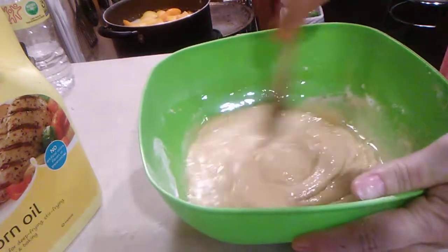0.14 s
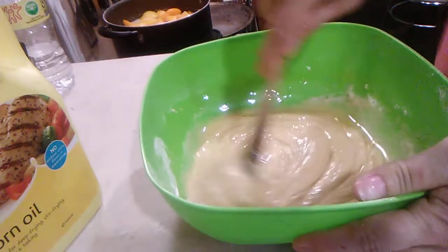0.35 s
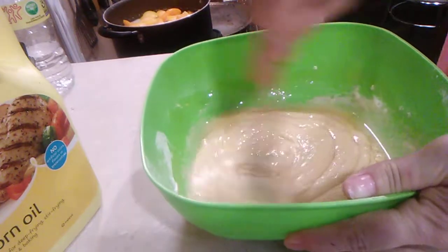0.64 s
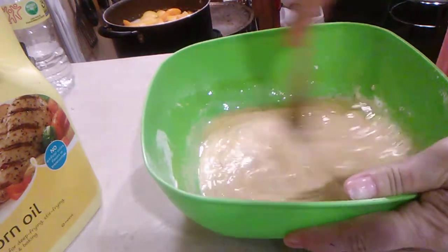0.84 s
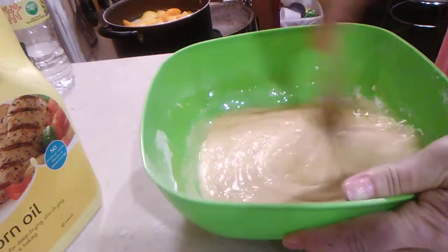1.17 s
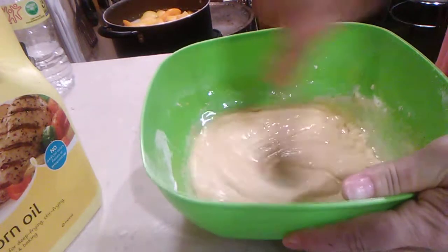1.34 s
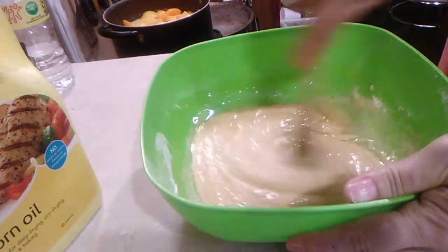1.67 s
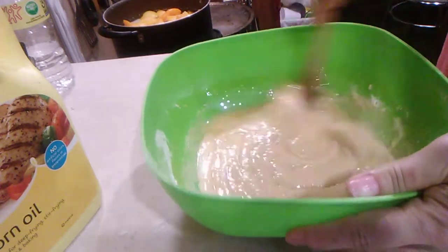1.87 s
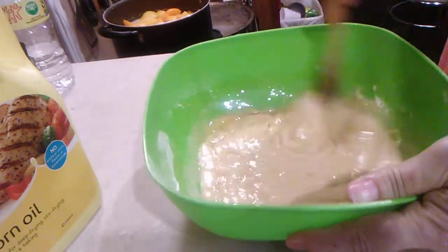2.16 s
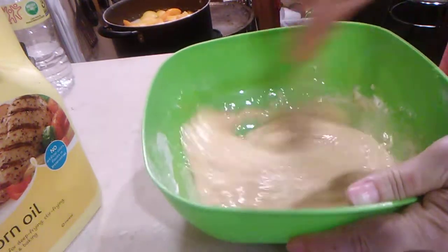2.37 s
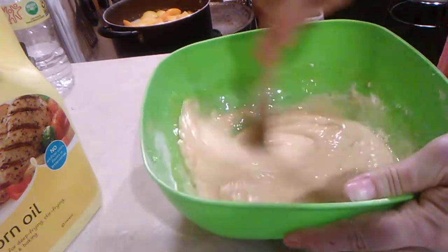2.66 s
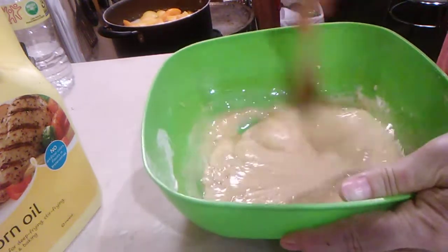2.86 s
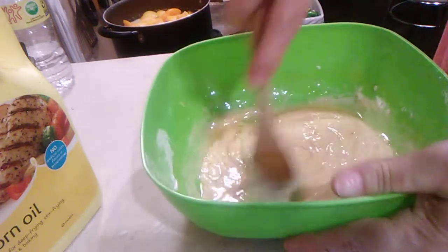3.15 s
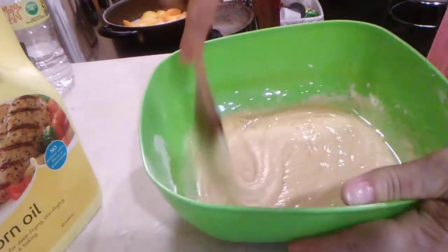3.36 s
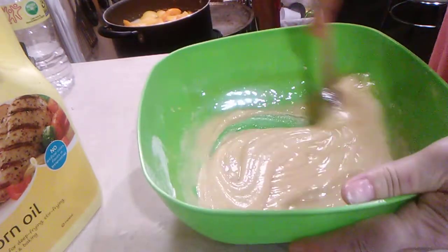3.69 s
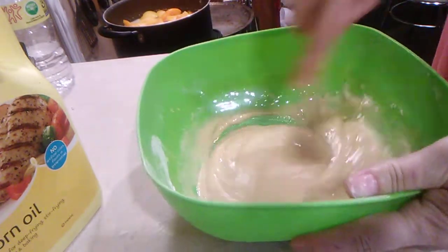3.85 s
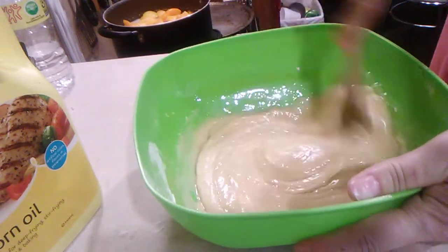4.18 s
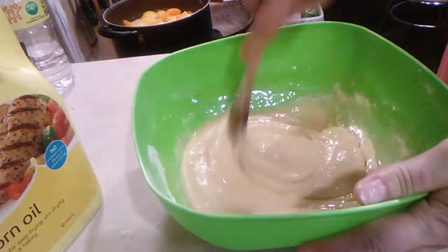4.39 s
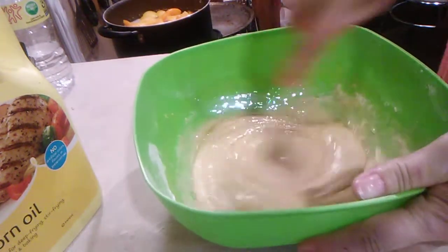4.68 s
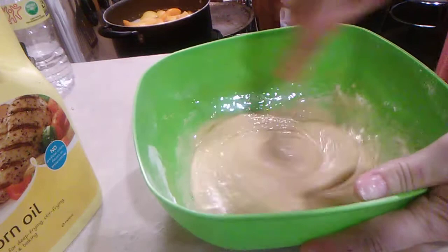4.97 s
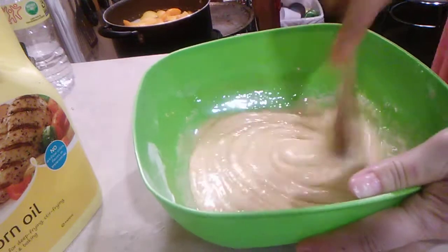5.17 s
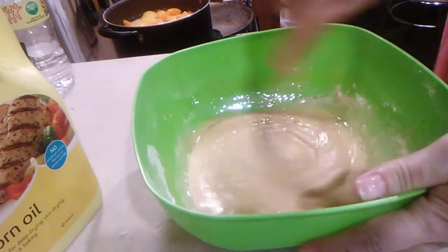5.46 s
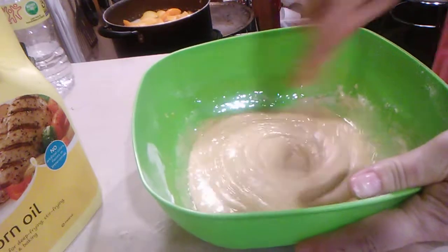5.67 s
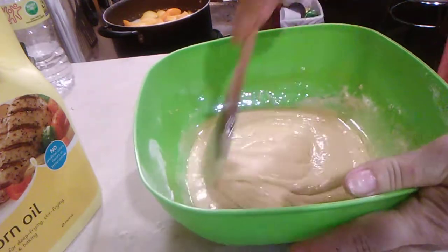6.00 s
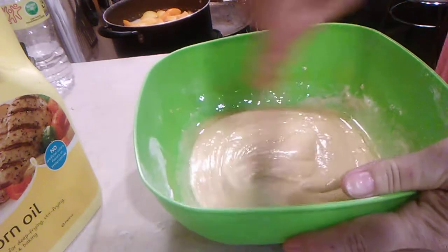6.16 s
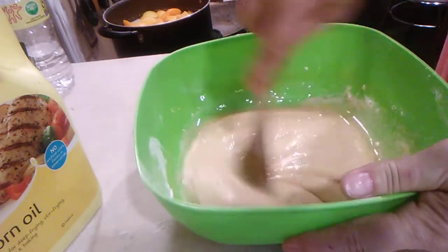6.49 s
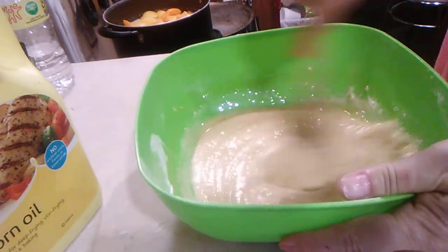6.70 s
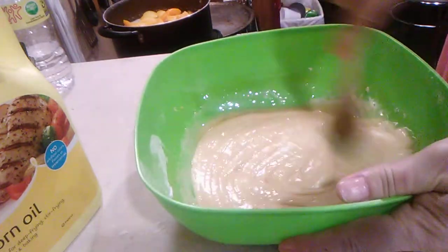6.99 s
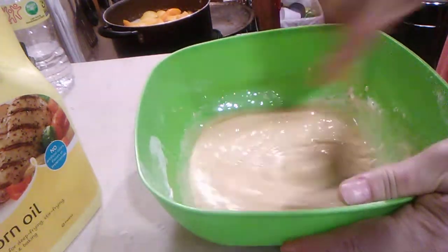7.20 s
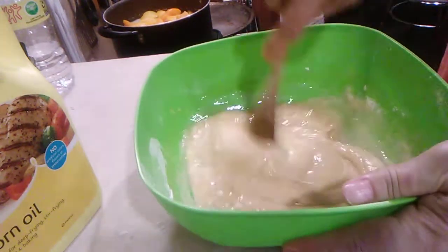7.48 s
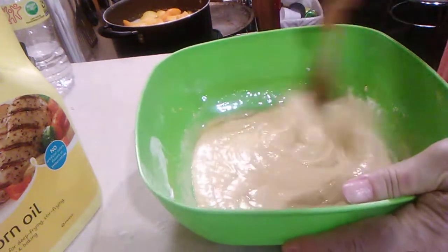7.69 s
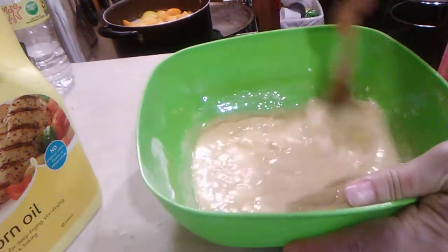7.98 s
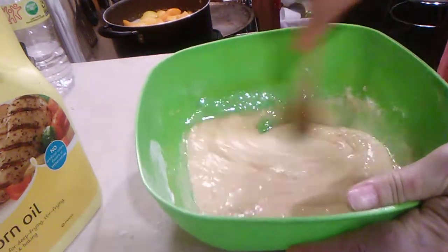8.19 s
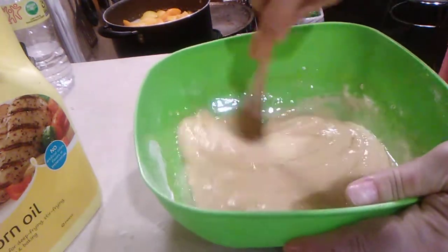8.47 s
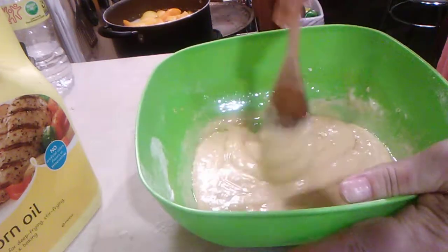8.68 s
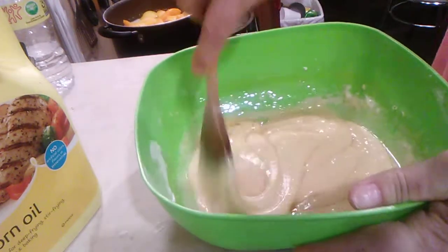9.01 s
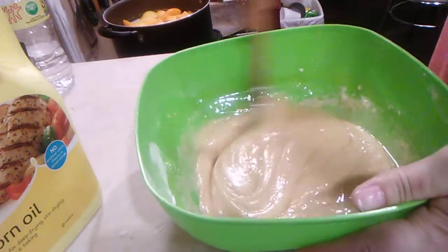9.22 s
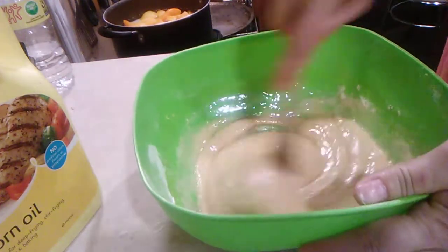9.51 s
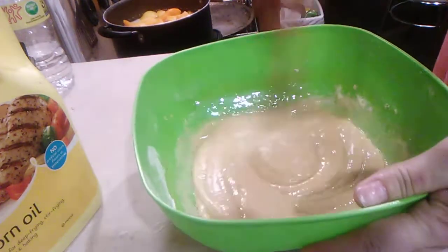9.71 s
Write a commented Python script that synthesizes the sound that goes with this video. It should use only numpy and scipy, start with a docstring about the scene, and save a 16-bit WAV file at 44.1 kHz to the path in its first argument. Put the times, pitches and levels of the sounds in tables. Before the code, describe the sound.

A wooden spoon beats thick batter in a plastic bowl, with hollow knocks, sticky wet crackle, smacks and soft table bumps in a small kitchen.

```python
"""A wooden spoon beats thick batter in a hand-held plastic bowl: knocks ring the bowl's damped wall.
Pressed along the wall, the spoon sticks and slips in soft gulps, and once its edge rasps.
The batter crackles with bursts of tiny rising pings, smacks as films rip, and plops as air pockets ring.
The bowl bumps the kitchen table with low bouncing tones and rumbles as filtered noise.
A small room adds an echo and a fading tail; faint air noise, a wavering hum and a thin whine lie behind."""
import sys
import numpy as np
from scipy import signal
from scipy.fft import rfft, irfft, next_fast_len
from scipy.io import wavfile
from scipy.ndimage import uniform_filter1d

SR = 44100
rng = np.random.default_rng(int(sys.argv[2]) if len(sys.argv) > 2 else 0)


def to_wav(sig):
    """Store sig (one row per channel, or 1-D mono) as 16-bit WAV at the path in sys.argv[1].

    Samples outside -1..1 are clipped; the rate is SR.
    """
    pcm = np.clip(np.atleast_2d(sig), -1, 1) * 32767
    pcm = np.round(pcm).astype(np.int16)
    wavfile.write(sys.argv[1], SR, pcm.T)  # frames by channels


N = 434365
TIME = np.arange(N) / SR
# a sweep through the batter sets in, swells towards its middle and dies away
SWEEP_ATTACK_S, SWEEP_SWELL_DB, SWEEP_RELEASE_S = .006, 3, 0.033
# table levels are starting levels: each function may add its own gain, and the room comes after


def amp(db):
    """Turns decibels into a gain."""
    return 10 ** (np.asarray(db) / 20)


def evened(x):
    """Scales a sound to an average strength (rms) of 1."""
    return x / np.sqrt(np.mean(x ** 2) + 1e-20)


def steadied(x, size=2200):
    """Evens out the slow ups and downs of a texture while keeping its fine grain."""
    power = uniform_filter1d(uniform_filter1d(np.mean(evened(x) ** 2, 0), size), size // 2)
    return evened(x) / np.sqrt(abs(power) + 1e-3)


def read(points, hz):
    """Reads a table between its points on a log-frequency axis."""
    f, value = np.transpose(points)
    return np.interp(np.log(hz + 1), np.log(f + 1), value)


def follow(rows, axis):
    """Draws one column of a table as a curve over every sample."""
    rows = np.array(rows)
    return np.interp(TIME, rows[:, 0], rows[:, axis])


def add(mix, s, sound):
    """Adds a sound into the mix at a time in seconds."""
    part = mix[..., max(round(s * SR), 0):][..., :sound.shape[-1]]
    part += sound[..., :part.shape[-1]]


def ring(x, response):
    """Makes a sound ring through an impulse response."""
    return signal.fftconvolve(np.atleast_2d(x), np.atleast_2d(response), axes=1)[:, :x.shape[-1]]


def colour(points, size=2048):
    """Makes a unit-energy filter that starts at once and has the given spectrum (minimum phase)."""
    log_gain = np.log(amp(read(points, abs(np.fft.fftfreq(size, 1 / SR)))))
    h = np.fft.ifft(np.exp(np.conj(signal.hilbert(log_gain)))).real[:size // 2]
    return h / np.linalg.norm(h)


def wander(hz):
    """Drifts at random with rms 1, up to the given rate."""
    step_s = 1 / (hz * 2)
    return evened(np.interp(TIME / step_s, np.arange(2048), rng.standard_normal(2048)))


def grains(per_s, spread_db, scatter):
    """Scatters clicks of uneven size, each with its own strength on the left and right."""
    size = amp(spread_db * np.minimum(rng.exponential(1, N), 4.5))
    clicks = size * (rng.random(N) < per_s / SR) * rng.choice([-1, 1], N)
    return evened(clicks * (1 + scatter * rng.standard_normal((2, N))))


def strokes(rows, axis, attack_s, swell_db, release_s):
    """Follows the level of strokes: each sets in, arches over its length and dies away."""
    power, t = np.zeros(N), TIME[:SR]
    for row in rows:
        start, length = row[:2]
        arch = np.sin(np.pi * np.minimum(t / length, 1)) - 1
        shape = (1 - np.exp(-t / attack_s)) * np.exp(-np.maximum(t - length, 0) / release_s)
        add(power, start, (amp(row[axis] + swell_db * arch) * shape) ** 2)
    return np.sqrt(power)


def settling(hits, settle_s):
    """Follows a level that jumps with each hit and settles."""
    level = np.zeros(N)
    for s, db, *_ in hits:
        add(level, s, amp(db) * np.exp(-TIME[:SR] / settle_s))
    return level


# ringing tones of the batter-loaded bowl: (pitch [Hz], level [dB], time to fade by 60 dB [s])
BOWL_MODES = [(284, -4.5, 0.046), (386, -8.5, 0.019), (480, 1.5, 0.021), (536.9, 9.5, 0.03),
              (610, 14, 0.027), (673.3, 3.5, 0.029), (771, -5.5, 0.0087), (896, -14, 0.018),
              (1058, -22, 0.054), (1295, -16, 0.025), (1405, -17, 0.035), (1680, -20, 0.011),
              (1885, -22, 0.018), (2330, -19, 0.0093)]
BOWL_HZ = 544.3  # a contact at this pitch leaves the low modes in place


def bowl(pitch_hz, hard_db, give=0.5, focus_db=14, detune=0.011, rise_turns=1.61,
         sag=0.16, sag_s=0.0031, place_db=4.0, size=4096):
    """Rings one blow: the loaded low modes follow the contact's pitch, hard contact wakes the upper modes."""
    t = np.arange(size) / SR
    hz, db, t60 = np.transpose(BOWL_MODES)[:, :, None]
    bare = hz > 830  # the upper modes, of the bare wall
    upper_db = hard_db + place_db * rng.standard_normal(hz.shape)
    lower_db = -focus_db * abs(np.log2(hz / pitch_hz))
    db = db + np.where(bare, upper_db, lower_db)
    shift = np.where(bare, 1, (pitch_hz / BOWL_HZ) ** give)
    hz = hz * shift * (1 + detune * rng.standard_normal(hz.shape))
    # the pressing spoon holds the pitch down at first, so each blow gulps upward
    turns = hz * np.cumsum(1 - sag * np.exp(-t / sag_s)) / SR
    onset = 1 - np.exp(-(turns / rise_turns) ** 2)
    return (amp(db - 60 * t / t60) * np.sin(2 * np.pi * turns) * onset).sum(0)


# spoon strikes: (time [s], level [dB], contact pitch [Hz], hardness [dB], rebound delay [s],
# rebound level against the blow [dB])
STRIKES = [(0.0484, -24.5, 427, 12.5, 0.0062, 4), (0.566, -31.5, 576, -5, 0.0038, -1.5),
           (0.6901, -31.5, 346, -6, 0.0052, 3), (0.8186, -27, 442, -12, 0.0035, -8.5),
           (0.8876, -32.5, 466, -29, 0.004, -12), (0.9165, -23.5, 586, -33, 0.0051, -2),
           (0.933, -33.5, 562, -10, 0.0069, 10), (1.1563, -20.5, 535, -9, 0.0035, -4.5),
           (1.2599, -19, 603, -13, 0.0068, -3), (1.3878, -27.5, 450, -21, 0.0079, -9),
           (1.4763, -23.0, 560, -2.5, 0.0033, -9), (1.8202, -29, 500, -12, 0.009, -4.5),
           (2.1721, -31.5, 604, 5.5, 0.0087, 3.5), (2.3589, -41, 405, -22, 0.011, -15),
           (2.3949, -39, 530, -29, 0.0044, 3), (2.4928, -40.5, 560, 8, 0.0103, -1),
           (2.6678, -35.5, 394, 9, 0.008, -14), (2.6914, -40, 504, 1, 0.012, 5.5),
           (2.7432, -37, 540, -11, 0.0036, -4), (2.768, -42, 480, -15, 0.0092, -4),
           (2.78, -29, 427, -20, 0.0125, -15), (2.7967, -38.5, 400, -3, 0.0116, 1),
           (2.831, -35.5, 607, -9, 0.00346, 4), (3.2108, -39.5, 580, 5, 0.0032, -2),
           (3.9092, -29, 506, -13, 0.0074, 0.0), (4.0765, -39, 383, 9.5, 0.004, -1),
           (4.2915, -33, 410, -12, 0.0098, -17), (4.3187, -23.5, 565, 4.5, 0.0084, -6),
           (4.3439, -22.5, 546, 8, 0.0075, -7), (4.468, -28, 557, 1, 0.0051, -5),
           (4.675, -35.5, 547.0, 12, 0.0076, -8), (4.6974, -18, 549, -5.5, 0.0083, -1),
           (4.705, -22, 693, -17, 0.0033, 0.5), (4.7624, -32.5, 450, -3, 0.0049, -22),
           (4.8008, -30, 530, -1, 0.0087, -9), (5.0579, -36.5, 725, 7, 0.0056, -15),
           (5.31, -38.5, 620, 6.5, 0.0072, 4), (6.1122, -39.5, 590, 2, 0.0052, 6),
           (6.2079, -31, 447, -13, 0.0072, -15), (6.3231, -24, 494, 5.5, 0.0039, -1),
           (6.383, -34.5, 406, -19, 0.0037, -12), (6.4005, -26, 518, -34, 0.0035, -23),
           (6.541, -36.5, 560, -26, 0.0081, -18), (6.7252, -38.5, 590, -2, 0.0048, -1),
           (6.7594, -26.5, 573, -14, 0.0035, -12), (6.881, -37.0, 475, -26, 0.0093, -21),
           (7.0983, -18, 650, -33, 0.005, 0.5), (7.1301, -28, 650, -19, 0.0048, -1),
           (7.3097, -32.5, 465, -28, 0.0091, -20), (7.4643, -36, 562.0, 10.5, 0.0091, -1.5),
           (7.671, -34.5, 498, -14, 0.0089, -5), (7.8247, -36.5, 586, 0, 0.008, -4),
           (7.9899, -30, 570, 3.5, 0.0085, 0), (8.1313, -33, 580, 7, 0.0039, -0.5),
           (8.233, -42, 514, 0, 0.0057, 3), (8.306, -36.5, 435, 5.5, 0.0072, -4),
           (8.9698, -28, 498, -22.5, 0.0074, -8.5), (9.5383, -29, 448, -17, 0.0032, 4),
           (9.6842, -34.5, 528, 7, 0.0076, 1.5), (9.7784, -35.5, 431.0, 8, 0.012, -21)]
# colour of the wet splat: (frequency [Hz], level [dB])
SPLAT_COLOUR = [(300, -21.5), (800, -0.5), (1200, 2.5), (2000, -9), (3000, -22), (6000, -43)]


def knocks(gain_db=-0.5, chatter_db=-9, chatter_s=0.00702, splat_db=-17, splat_s=0.0035,
           squeeze_db=-19, squeeze_s=0.0032, size=4096):
    """Squeezes batter aside, lands with a wet splat, rebounds, then chatters briefly as the spoon slides on."""
    out, t = np.zeros(N), np.arange(size) / SR
    lead = size // 2
    for s, db, hz, hard_db, rebound_s, rebound_db in STRIKES:
        blow = bowl(hz, hard_db)
        blow = amp(db + gain_db) * blow / abs(blow).max()
        splat = ring(rng.standard_normal(size) * t * np.exp(-t / splat_s), colour(SPLAT_COLOUR))[0]
        add(out, s, blow + amp(db + hard_db / 2 + splat_db) * splat / abs(splat).max())
        rebound = bowl(hz, hard_db)
        add(out, s + rebound_s, amp(db + gain_db + rebound_db) * rebound / abs(rebound).max())
        # noise that swells up to the blow
        swell = np.exp(-abs(t - t[lead]) / squeeze_s) * (t < t[lead])
        squeeze = ring(rng.standard_normal(size) * swell, blow)[0]
        blow_size = np.linalg.norm(blow)
        add(out, s - t[lead], amp(squeeze_db) * squeeze * blow_size / np.linalg.norm(squeeze))
        # this noise starts early but is strongest just after the blow
        chatter = ring(rng.standard_normal(size) * t ** 2 * np.exp(-t / chatter_s), blow)[0]
        add(out, s - chatter_s, amp(chatter_db) * chatter * blow_size / np.linalg.norm(chatter))
    return out


# sweeps of the spoon through the batter: (start time [s], length [s], froth crackle level [dB],
# wet squelch level [dB], fine fizz level [dB])
SWEEPS_IN_BATTER = [(0.0, 0.16, -48, -55, -95), (0.71, 0.061, -65, -64, -90),
                    (0.865, 0.21, -50, -59, -69.5), (1.04, 0.15, -53, -63.5, -66),
                    (1.22, 0.14, -49, -61, -62.5), (1.39, 0.31, -52, -64.5, -66.5),
                    (1.83, 0.13, -57, -60.5, -87), (1.878, 0.032, -45, -59.5, -62),
                    (1.95, 0.1, -54, -62, -88), (2.19, 0.1, -54.5, -63, -71), (2.28, 0.14, -46, -58.5, -65),
                    (2.49, 0.11, -50, -63.5, -70), (2.62, 0.12, -48.5, -50, -60),
                    (2.72, 0.13, -51.5, -88, -93), (3.22, 0.18, -58, -66, -75),
                    (3.395, 0.074, -50.5, -64.5, -78), (3.48, 0.15, -52, -73, -60.5),
                    (3.67, 0.061, -52, -66.5, -70), (3.835, 0.27, -58.5, -63, -78),
                    (4.05, 0.5, -57.5, -57.5, -73), (4.27, 0.31, -46, -54.5, -62),
                    (4.58, 0.21, -47.5, -54.5, -82.5), (4.83, 0.6, -55, -59.5, -93),
                    (5.17, 0.15, -73, -63, -91), (5.35, 0.19, -56.5, -58, -78), (5.54, 0.26, -73, -67, -83),
                    (6.04, 0.029, -59, -94, -65.5), (6.21, 0.32, -51, -63, -65.5),
                    (6.57, 0.55, -50, -61, -66.5), (6.86, 0.23, -49, -61.5, -69),
                    (7.04, 0.21, -50.5, -58, -64), (7.31, .22, -49.5, -56.5, -67.5),
                    (7.69, 0.094, -65, -66, -90), (7.745, 0.092, -63, -56.5, -65),
                    (7.81, 0.026, -53, -51.5, -67), (8.0, 0.26, -63, -65, -71),
                    (8.35, 0.19, -57, -58.5, -70), (8.974, 0.02, -48, -64, -61.5),
                    (9.05, 0.21, -58, -72, -70.5), (9.3, 0.14, -57.5, -64.5, -68),
                    (9.465, 0.14, -56.5, -63, -76), (9.61, 0.52, -50, -57, -62)]


def sweeping(axis):
    """Follows the level of froth (2), squelch (3) or fizz (4) as the spoon sweeps."""
    return strokes(SWEEPS_IN_BATTER, axis, SWEEP_ATTACK_S, SWEEP_SWELL_DB, SWEEP_RELEASE_S)


# the spoon is pressed along the wall and judders: (start time [s], length [s], level [dB])
WALL_DRAGS = [(0.069, 0.13, -55.5), (0.229, 0.068, -55.5), (0.864, 0.12, -39), (1.236, 0.047, -38.5),
              (1.55, 0.023, -48), (1.846, 0.23, -61.5), (2.301, 0.16, -53.5), (2.761, 0.12, -52.5),
              (3.88, 0.021, -47), (4.293, 0.049, -46), (4.636, 0.041, -46.5), (4.928, 0.22, -55),
              (5.182, 0.2, -54), (5.492, 0.058, -49.5), (5.71, 0.03, -49), (6.415, 0.064, -51),
              (6.72, 0.14, -51.5), (7.134, 0.087, -52.5), (7.476, 0.02, -47), (7.976, 0.093, -48.5),
              (9.493, 0.078, -52.5), (9.817, 0.029, -41.5)]


def rub(clump_db=5, lump_db=3, hard_db=-7, octaves=0.58, sag=0.24, climb_db=6, graze_db=-3):
    """Sticks and slips along the wall: soft gulps whose pitch hops about and climbs through each drag."""
    ends = [point for s, length, _ in WALL_DRAGS for point in ((s, -1), (s + length, 1))]
    progress = follow(ends, axis=1)
    slips = 0
    for k in np.linspace(-1, 1, 4):  # from the lowest gulps to the highest
        strength = amp(clump_db * wander(hz=14) + climb_db * k * progress)
        gulp = bowl(BOWL_HZ * 2 ** (octaves * k), hard_db, focus_db=27.0, sag=sag, sag_s=0.0044)
        slips = slips + ring(grains(per_s=65, spread_db=2, scatter=0.29) * strength, gulp)
    drags = strokes(WALL_DRAGS, axis=2, attack_s=0.0074, swell_db=9, release_s=0.021)
    # even a free sweep grazes the wall
    pressure = np.hypot(drags, amp(graze_db) * sweeping(axis=3))
    return evened(steadied(slips) * amp(lump_db * wander(hz=21.75))) * pressure


# the spoon's edge rasps on the bare wall: (start time [s], length [s], level [dB])
EDGE_RASPS = [(4.518, 0.038, -45)]
# wall tones the rasp rings: (pitch [Hz], level [dB], time to fade by 60 dB [s])
BARE_WALL_MODES = [(2650, -11, .008), (3230, -6.5, 0.041), (3795, 1.5, 0.031), (4230, -1, 0.025),
                   (5400, 4.5, 0.0088)]


def rasp(slips_hz=325, jitter=0.44, uneven_db=7.5, size=2048):
    """Catches the bare wall with the spoon's edge, which slips in a quick uneven series."""
    t = np.arange(size) / SR
    slip_count = np.floor(np.cumsum(slips_hz * (1 + jitter * wander(hz=89.3))) / SR)
    slips = np.diff(slip_count, prepend=0)
    wall = sum(amp(db - 60 * t / t60) * np.sin(2 * np.pi * hz * t) for hz, db, t60 in BARE_WALL_MODES)
    voice = evened(ring(slips * amp(uneven_db * rng.standard_normal((2, N))), wall))
    return voice * strokes(EDGE_RASPS, axis=2, attack_s=SWEEP_ATTACK_S, swell_db=SWEEP_SWELL_DB,
                           release_s=SWEEP_RELEASE_S)


def bubbles(lo_hz, hi_hz, turns, spread_db, scatter, clumps_per_s=110, clump_s=.009, spread=0.097,
            glide=0.17, lag_s=.00008, count=18, size=200):
    """Bursts clumps of tiny rising pings, alike in size within a clump, so the colour keeps shifting."""
    clumps = int(clumps_per_s * N / SR)
    when, pitch, side = rng.random((clumps, 3)).T[:, :, None]
    at = (when * N + rng.exponential(clump_s * SR, (clumps, count))).astype(int).reshape(-1, 1)
    hz = lo_hz * (hi_hz / lo_hz) ** pitch * np.exp(spread * rng.standard_normal((clumps, count)))
    phase = np.minimum(hz, SR / 3).reshape(-1, 1) * np.arange(size) / SR
    height = amp(spread_db * np.minimum(rng.exponential(1, at.shape), 4)) * hz.reshape(-1, 1)
    rising = phase * (1 + glide * phase / (phase + turns * 2))
    ping = height * np.exp(-phase / turns) * np.sin(2 * np.pi * rising)
    pan = scatter * np.repeat(2 * side - 1, count, axis=0)
    index = at + np.arange(size)
    # the batter lies nearer the right microphone, so the left one hears it later
    late = index + np.abs(lag_s * SR * (1 - pan)).astype(int)
    left = np.bincount(late.ravel(), (ping * (1 + pan)).ravel(), N)[:N]
    right = np.bincount(index.ravel(), (ping * (1 - pan)).ravel(), N)[:N]
    return np.array([left, right])


# colour of the fine froth: (frequency [Hz], level [dB])
FROTH_COLOUR = [(1500, -21), (3500, -16), (4800, 0.5), (6200, 3), (7500, 9), (8500, 6), (10000, -8.5),
                (12000, -19), (14500, -27)]
# colour of the lower squelch: (frequency [Hz], level [dB])
SQUELCH_COLOUR = [(400, -6.5), (900, -7), (1200, -2), (1700, -8.5), (2700, -8), (3800, -4.5), (5500, -7.5),
                  (10000, -21.5)]
# where the crackle sits: (time [s], left-over-right level [dB])
SIDES = [(0.0, -11), (0.08, -8.5), (4.66, -10), (5.37, -13), (5.82, -10), (6.8, -9), (9.03, -7.5),
         (9.46, -16.5), (9.85, -6.5)]


def batter(froth_db=-4.5, squelch_db=-6.5, grit_db=-5, sticky_db=-2, froth_lump_db=2.1, squelch_lump_db=1.5,
           jolt_froth_db=-39.5, jolt_squelch_db=-33.5, jolt_s=0.055,
           rest_froth_db=-80.5, rest_squelch_db=-90, shift_db=3):
    """Shears batter: fine froth, the lower squelch of larger pockets, and snapping strands in both."""
    snaps = grains(per_s=1000, spread_db=-5.0, scatter=1.0) * amp(5.7 * wander(hz=44.94))
    snaps = steadied(snaps, size=6600)
    small = bubbles(lo_hz=5070, hi_hz=13920, turns=12.0, spread_db=-4.0, scatter=0.62, clumps_per_s=180)
    large = bubbles(lo_hz=802, hi_hz=4650, turns=3.3, spread_db=2.5, scatter=0.68,
                    clumps_per_s=130, spread=.22)
    froth = steadied(ring(small, colour(FROTH_COLOUR)), size=1200)
    squelch = steadied(ring(large, colour(SQUELCH_COLOUR)), size=1200)
    froth = evened(froth + amp(grit_db) * ring(snaps, colour(FROTH_COLOUR)))
    squelch = evened(squelch + amp(sticky_db) * ring(snaps, colour(SQUELCH_COLOUR)))
    sides = amp((follow(SIDES, axis=1) + shift_db) * [[.5], [-.5]])
    # each knock jolts the batter, and at rest it still fizzes faintly
    jolt, lumps = settling(STRIKES, jolt_s), wander(hz=20)
    froth_level = np.hypot(sweeping(axis=2), amp(jolt_froth_db) * jolt) + amp(rest_froth_db)
    squelch_level = np.hypot(sweeping(axis=3), amp(jolt_squelch_db) * jolt) + amp(rest_squelch_db)
    return (froth * sides * froth_level * amp(froth_db + froth_lump_db * lumps)
            + squelch * squelch_level * amp(squelch_db + squelch_lump_db * lumps))


def strands(gain_db=-9):
    """Parts sticky strands in separate crackles."""
    crackle = bubbles(lo_hz=1512, hi_hz=4670, turns=3.4, spread_db=2.5, scatter=0.35, clumps_per_s=26,
                      clump_s=.004, spread=.4, count=12)
    return amp(gain_db) * evened(crackle) * sweeping(axis=3)


# colour of the finest fizz: (frequency [Hz], level [dB])
FIZZ_COLOUR = [(6000, -19.5), (9000, 1.5), (10500, 3), (12500, -4), (14500, -11.5)]


def fizz(gain_db=-1, lump_db=2):
    """Bursts the very finest bubbles, at a fizz level set for each sweep."""
    fine = ring(grains(per_s=3700, spread_db=4.5, scatter=1.0), colour(FIZZ_COLOUR))
    sides = amp(follow(SIDES, axis=1) * [[.5], [-.5]])
    return evened(fine) * sides * sweeping(axis=4) * amp(gain_db + lump_db * wander(hz=5.2))


# batter tears off the spoon: (time [s], level [dB], cavity pitch [Hz], treble [dB],
# fade time [s], at least 0.002 when played)
TEARS = [(0.035, -43.5, 1250, -10, 0.014), (0.279, -59, 1120, -13, 0.014),
         (0.734, -46.5, 1770, -10, 0.0021), (0.749, -50.5, 1300, -2, 0.0071), (1.041, -52, 3000, 6, 0.0098),
         (1.074, -59.5, 2500, 19, 0.0075), (1.407, -47.5, 1810, -2, 0.015), (1.949, -46, 2040, -4, 0.02),
         (2.29, -43.5, 1450, -15, 0.014), (2.327, -42, 2000, -5, 0.0055), (2.502, -39.5, 2180, -7, 0.003),
         (2.687, -39.5, 1160, -13, 0.0054), (2.894, -69, 4570, 21.5, 0.0017),
         (3.462, -35, 1710, 3.5, 0.0013), (3.914, -47, 1940, -4, 0.011), (4.077, -50.5, 1120, 9.5, 0.0091),
         (4.23, -43.5, 1080, 0.5, 0.0039), (4.46, -47.5, 1160, 8.5, 0.0073),
         (4.859, -43.5, 1070, -32, 0.0055), (5.184, -43.5, 950, 3.5, 0.013),
         (5.427, -37.5, 3240, -29, 0.0019), (6.259, -48, 5100, 5, 0.0097), (6.399, -40, 3750, -16, 0.0015),
         (6.622, -44, 1350, 2, 0.0018), (6.801, -47.5, 800, -5, 0.0073), (6.992, -49, 1250, -10, 0.011),
         (7.096, -37.5, 910, -39, 0.0097), (7.244, -42.5, 2150, -1, 0.011), (8.123, -39, 1040, -4, 0.017),
         (8.445, -50, 1180, -18, 0.0093), (8.488, -48, 1460, -2, 0.011), (9.085, -56.5, 1530, -10, 0.044),
         (9.144, -37.5, 1730, -8, 0.0016)]


def smacks(gain_db=-4, treble_db=-1, cavity_db=9, octaves=0.29, right_db=6, rise_s=0.0054, size=6000):
    """Rips a film of batter: a quick burst of noise, coloured by the air pocket that opens."""
    out, t = np.zeros((2, N)), np.arange(size) / SR
    axis_hz = np.geomspace(100, 16000, 140)
    for s, db, hz, bright_db, fade_s in TEARS:
        burst = (1 - np.exp(-t / rise_s)) * np.exp(-t / max(fade_s, .002))
        uneven = rng.standard_normal(size) + 3.4 * rng.standard_normal((2, size))
        rips = rng.standard_normal(size) * uneven * burst
        away = np.log2(axis_hz / hz) / octaves
        pocket = read(SQUELCH_COLOUR, axis_hz) + cavity_db * np.exp(-away ** 2)
        low = evened(ring(rips, colour(np.transpose([axis_hz, pocket]))))
        high_db = bright_db + treble_db + right_db * np.array([[-.5], [.5]])
        high = evened(ring(rips, colour(FROTH_COLOUR))) * amp(high_db)
        add(out, s, amp(db + gain_db) * (low + high) * np.sqrt(np.mean(burst ** 2)) / burst.max())
    return out


def off_the_wall(x, echo=0.49, delay_s=.0026, sway_s=0.0002474):
    """Throws the batter's sound back off the bowl, over a path whose length keeps wandering."""
    return np.array([side + echo * np.interp(TIME - delay_s - sway_s * wander(hz=3), TIME, side)
                     for side in x])


def slurps(gain_db=-9, per_s=17, lo_hz=480, hi_hz=1900, length_s=0.0073, climb_per_s=14, width=.22,
           spread_db=4, size=2600):
    """Tears small pockets open: each a short rip through a cavity whose pitch climbs as it shrinks."""
    out, t = np.zeros(N), np.arange(size) / SR
    for k, (when, pitch, long) in enumerate(rng.random((int(per_s * N / SR), 3))):
        hz = lo_hz * (hi_hz / lo_hz) ** pitch
        decay_s = length_s * (.5 + long)
        rips = rng.standard_normal(size) ** 3 * t * np.exp(-2 * t / decay_s)
        # a resonator that slides: turn the sound down to zero pitch, smooth it, turn it back up
        turn = np.exp(2j * np.pi * np.cumsum(hz * (1 + climb_per_s * t)) / SR)
        r = np.exp(-np.pi * width * hz / SR)
        cavity = (turn * signal.lfilter([1], np.poly([r, r]), rips / turn)).real
        add(out, (k + when) / per_s, evened(cavity) * amp(spread_db * rng.uniform(-1, 1)))
    return amp(gain_db) * evened(out) * sweeping(axis=3)


# large air pockets open: (time [s], level [dB], middle pitch of the glide [Hz])
AIR_POCKETS = [(1.619, -35.5, 630), (2.057, -52, 600), (2.371, -37, 510), (4.172, -47.5, 1170),
               (5.097, -43.5, 380), (5.275, -41, 420), (5.364, -43, 725), (6.628, -46, 620),
               (7.231, -43.5, 520), (8.442, -36.5, 1100), (8.49, -46, 1310), (9.334, -52.5, 487)]


def plops(decay_s=0.0046, rise_s=0.002, glide=0.14, size=3000):
    """Opens a large air pocket behind the spoon that rings, rising as it shrinks."""
    out, t = np.zeros(N), np.arange(size) / SR
    for s, db, hz in AIR_POCKETS:
        turns = np.cumsum(hz * (1 + glide * (.5 - np.exp(-t / decay_s)))) / SR
        ping = np.sin(2 * np.pi * turns) * (1 - np.exp(-t / rise_s)) * np.exp(-t / decay_s)
        add(out, s, amp(db) * ping / abs(ping).max())
    return out


# single bubbles burst: (time [s], level [dB], middle pitch of the glide [Hz], left-over-right level [dB])
SINGLE_BUBBLES = [(2.681, -27.5, 7060, -7), (3.5032, -29, 9240, -5), (5.43, -37, 7100, -14.5),
                  (6.625, -40.5, 7900, -10), (6.831, -41.5, 6760, -5), (7.1, -34, 7800, -5),
                  (7.307, -31.5, 6370, -3), (9.313, -39, 7700, -9), (9.3173, -46, 8240, -7)]


def pops(gain_db=10, decay_s=0.00012, glide=0.033, snap=0.28, snap_s=0.0001, film_share=0.67, size=300):
    """Opens a larger bubble: its film snaps as a high, rising ping sounds and quickly dies."""
    out, t = np.zeros((2, N)), np.arange(size) / SR
    for s, db, hz, pan_db in SINGLE_BUBBLES:
        turns = np.cumsum(hz * (1 + glide * (.5 - np.exp(-t / decay_s)))) / SR
        ping = np.sin(2 * np.pi * turns) * np.exp(-t / decay_s) * (1 - np.exp(-(turns / 2) ** 2))
        film = rng.standard_normal(size) * np.exp(-t / snap_s)
        burst = ping / abs(ping).max() + snap * film / abs(film).max()
        low_cut = signal.butter(4, min(film_share * hz, SR / 4), "highpass", fs=SR, output="sos")
        sides = amp(db + gain_db + pan_db * np.array([[.5], [-.5]]))
        add(out, s, sides * signal.sosfilt(low_cut, burst))
    return out


# bowl bumps the table: (time [s], level [dB], base pitch [Hz])
TABLE_BUMPS = [(0.582, -41, 66), (0.7, -38, 111), (0.825, -41, 59), (1.164, -38, 54), (1.301, -38, 57.5),
               (1.399, -43.5, 107), (1.481, -36, 62), (1.494, -58, 127), (2.169, -35, 111),
               (3.217, -42.5, 136.4), (4.33, -38.5, 112), (5.215, -45.5, 116), (6.14, -34, 93),
               (6.211, -34, 129), (6.332, -39, 109), (6.802, -44, 109), (7.31, -44.5, 76),
               (8.005, -26, 128), (8.321, -41, 187), (8.347, -36, 121)]
# tones of the bowl bouncing on the table: (factor on the base pitch, level [dB], time to fade by 60 dB [s])
TABLE_MODES = [(.56, -9.5, 0.11), (1.04, 2, 0.059), (1.75, -11, 0.13)]


def thumps(gain_db=2, rise_s=0.0024, size=8192):
    """Settles the heavy bowl on the table with a soft low bounce."""
    out, t = np.zeros(N), np.arange(size) / SR
    for s, db, hz in TABLE_BUMPS:
        body = sum(amp(level - 60 * t / t60) * np.sin(2 * np.pi * hz * k * t) for k, level, t60 in TABLE_MODES)
        body = body * (1 - np.exp(-t / rise_s))
        add(out, s, amp(db + gain_db) * body / abs(body).max())
    return out


# colour of the bowl's rumble: (frequency [Hz], level [dB])
RUMBLE_COLOUR = [(15, -36.5), (30, -33), (55, 10), (75, -4.5), (95, -10.5), (130, -4.5), (200, -7),
                 (400, -46), (1000, -84.5)]


def handling(stir_db=-14.5, rock_db=-10, rock_s=0.034):
    """Rumbles faintly as the held bowl shuffles with the stirring and rocks on after a bump."""
    level = np.hypot(amp(stir_db) * sweeping(axis=2), amp(rock_db) * settling(TABLE_BUMPS, rock_s))
    return ring(rng.standard_normal(N) * level, colour(RUMBLE_COLOUR, size=8192))


# how long the room rings: (frequency [Hz], time to fade by 60 dB [s])
ROOM_DECAY = [(100, 0.14), (600, 0.083), (2000, 0.15), (7000, 0.14), (14000, 0.19)]


def room(x, wet_db, echo=.3, left_s=0.0075, right_s=0.0025, size=22050):
    """Joins the direct sound, an echo off a near surface, and a diffuse tail dying band by band."""
    hz, t, z = signal.stft(rng.standard_normal((2, size)), SR, nperseg=256)
    fading = z * amp(-60 * t / read(ROOM_DECAY, hz)[:, None])
    tail = signal.istft(fading, SR, nperseg=256)[1]
    tail[:, :SR // 400] = 0  # the tail waits 2.5 ms
    response = amp(wet_db) * tail / np.linalg.norm(tail[0])
    response[:, 0] += 1
    response[[0, 1], [round(left_s * SR), round(right_s * SR)]] += echo
    return ring(x, response)


# colour of the room's air noise: (frequency [Hz], level [dB])
AIR_COLOUR = [(20, -27), (55, 5.5), (85, -1.5), (125, -3), (180, -12), (260, 0), (450, -12), (1600, -22.5),
              (4000, -26), (7800, -25.5), (11000, -28), (14500, -29)]
# how alike left and right are in the air noise: (frequency [Hz], likeness [0-1])
LIKENESS = [(60, 0.8), (500, 0.73), (1500, 0.099), (5000, 0.17), (14000, 0.14)]
# hum and a thin whine: (pitch [Hz], level [dB])
HUM_TONES = [(59.5, -75), (120, -77.5), (14000, -100.5)]


def kitchen(air_db=-70, waver_db=2.5):
    """Lays faint room noise under a wavering mains hum and a thin whine."""
    size = next_fast_len(N, True)
    hz = np.fft.rfftfreq(size, 1 / SR)
    a, b = rfft(rng.standard_normal((2, size)))
    same = np.clip(read(LIKENESS, hz), -1, 1)
    left_right = np.array([a, same * a + np.sqrt(1 - same ** 2) * b])
    air = irfft(left_right * amp(read(AIR_COLOUR, hz)), size)[:, :N]
    hum = 0
    for pitch_hz, db in HUM_TONES:
        tone = evened(np.sin(2 * np.pi * (pitch_hz * TIME + rng.random())))
        hum = hum + amp(db + waver_db * wander(hz=12.0)) * tone
    return amp(air_db) * evened(air) + hum


def scene():
    """Mixes bowl, batter and table sounding in the kitchen."""
    wall = room(knocks() + rub() + plops() + slurps(), wet_db=-3.5, echo=0.31,
                left_s=0.005805, right_s=0.005465)
    wet_batter = off_the_wall(batter() + strands() + fizz() + smacks())
    wet = room(wet_batter + rasp(), wet_db=-6, echo=0.16)
    # the table's sound is slightly louder on the right
    table = room(thumps() + handling(), wet_db=-8, echo=0.058) * amp([[-1], [1]])
    return wall + wet + room(pops(), wet_db=-2.0, echo=0.4) + table + kitchen()


def record(dry, low_hz=42, edge_hz=14520):
    """Cuts the deep bass and everything above the upper band edge."""
    low_cut = signal.butter(3, low_hz, "highpass", fs=SR, output="sos")
    thinned = signal.sosfilt(low_cut, dry)
    band_limit = signal.firwin(301, edge_hz, window=("kaiser", 7), fs=SR)
    return signal.oaconvolve(thinned, band_limit[None], "same")


dry = scene()
out = record(dry)
to_wav(out)
```